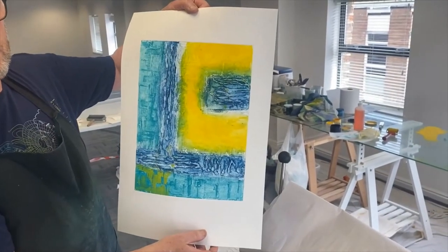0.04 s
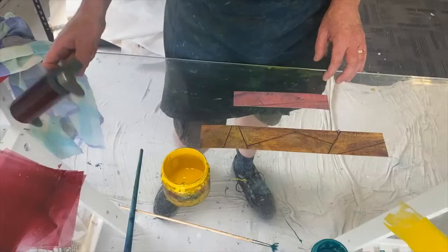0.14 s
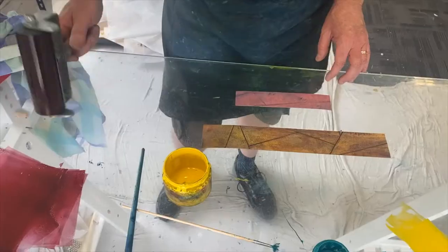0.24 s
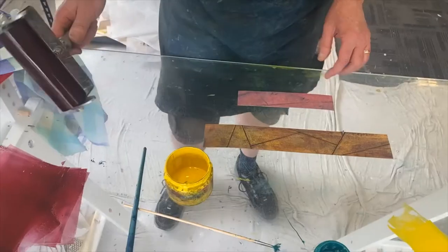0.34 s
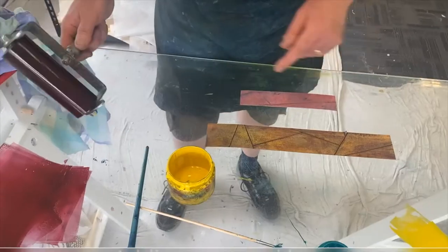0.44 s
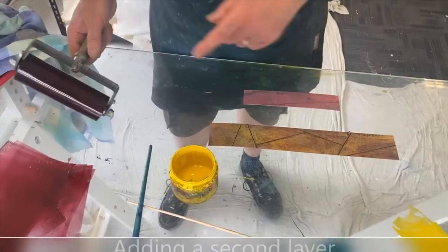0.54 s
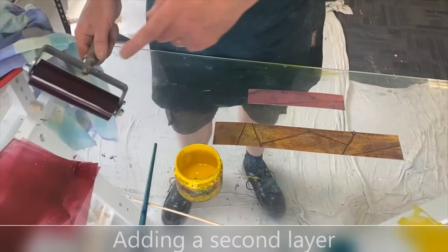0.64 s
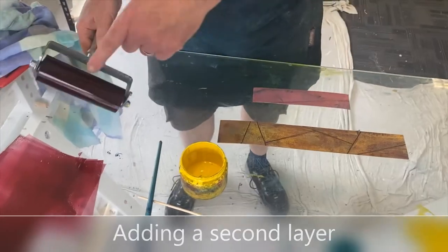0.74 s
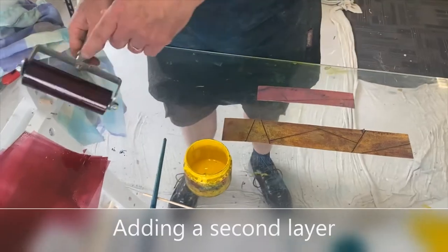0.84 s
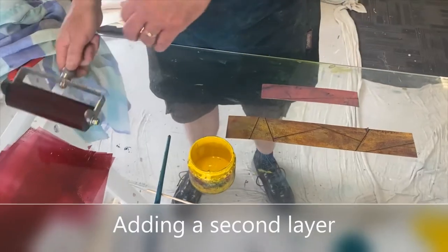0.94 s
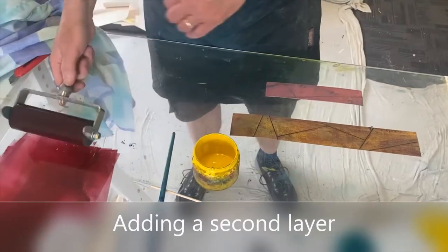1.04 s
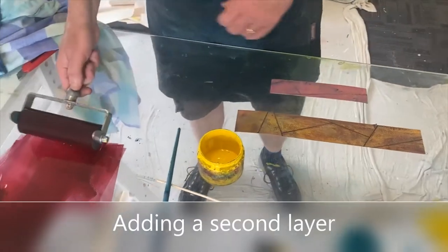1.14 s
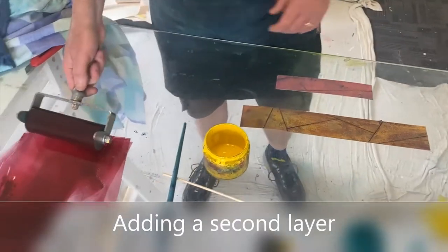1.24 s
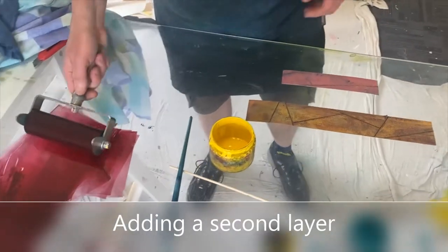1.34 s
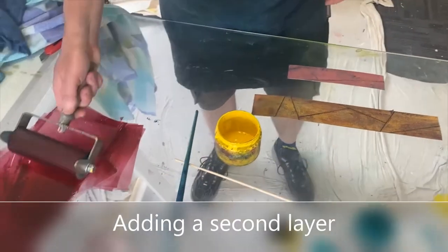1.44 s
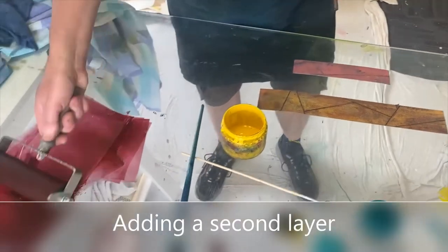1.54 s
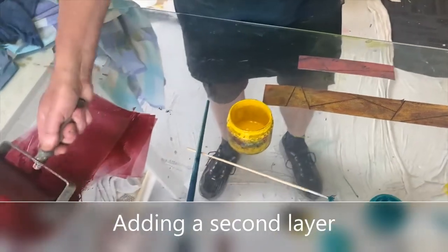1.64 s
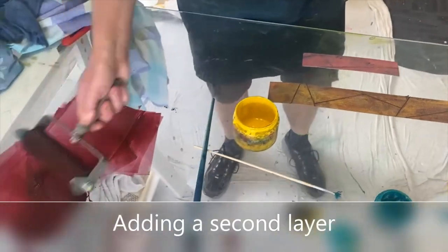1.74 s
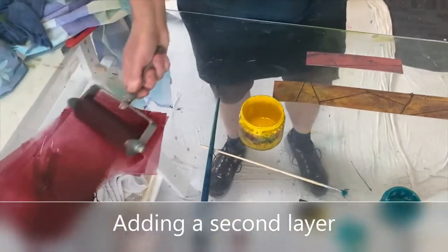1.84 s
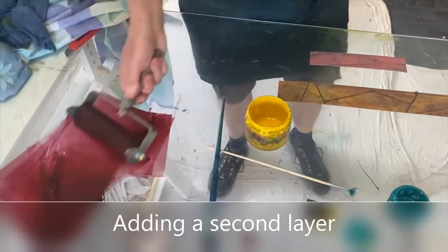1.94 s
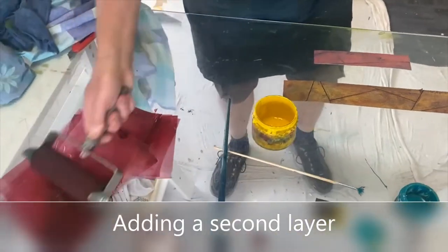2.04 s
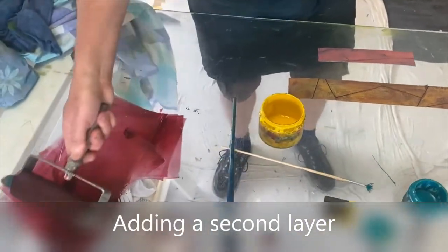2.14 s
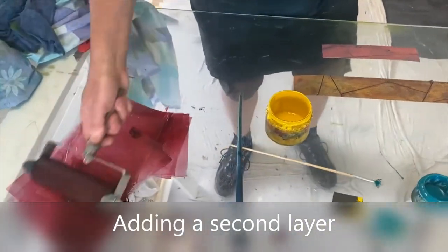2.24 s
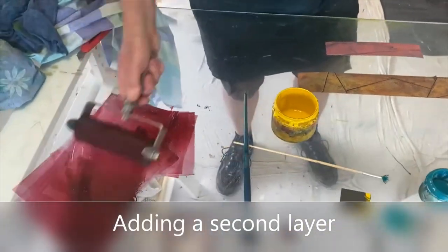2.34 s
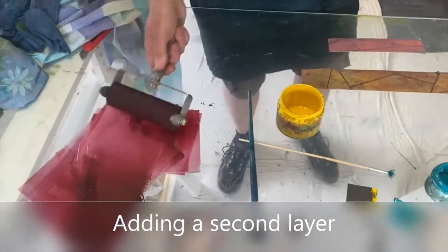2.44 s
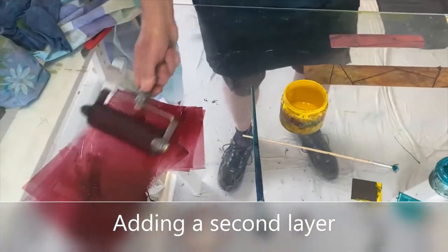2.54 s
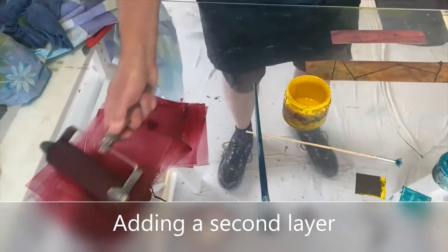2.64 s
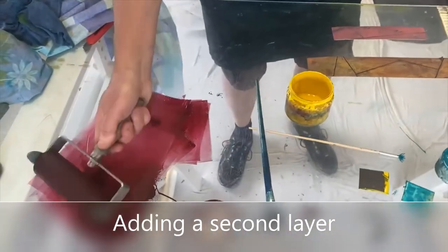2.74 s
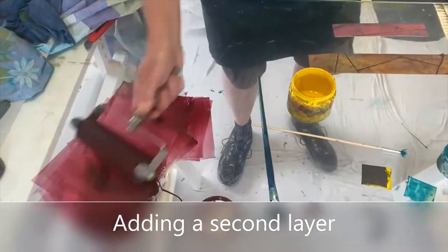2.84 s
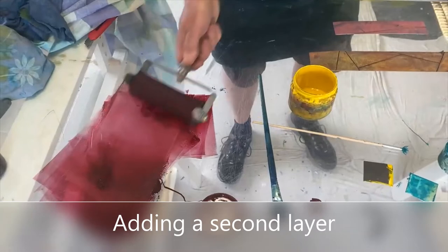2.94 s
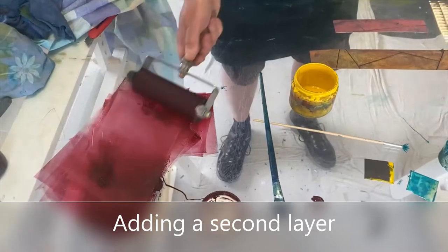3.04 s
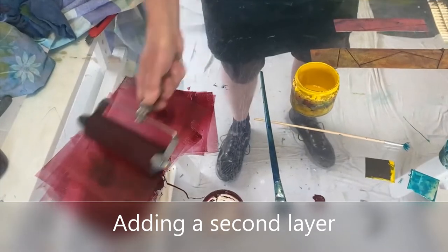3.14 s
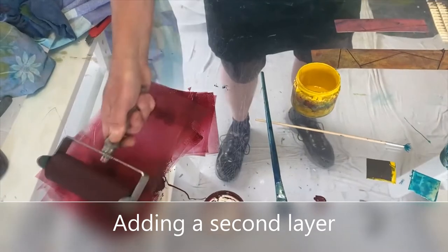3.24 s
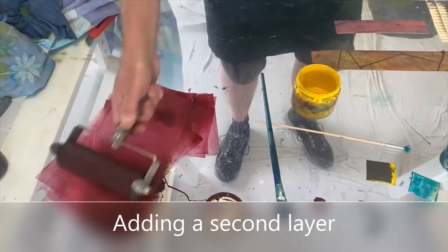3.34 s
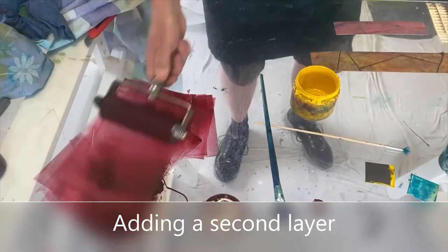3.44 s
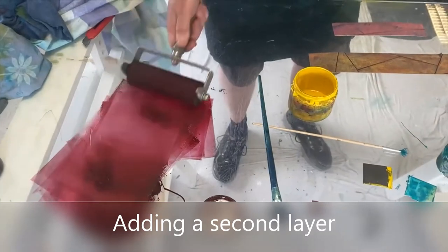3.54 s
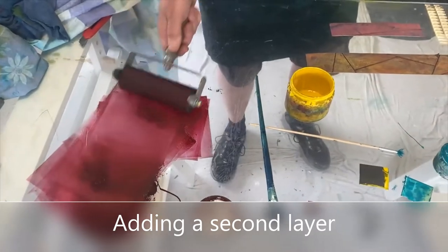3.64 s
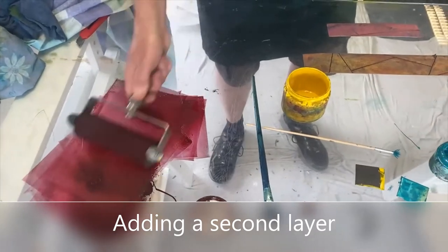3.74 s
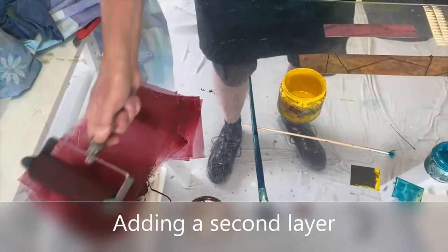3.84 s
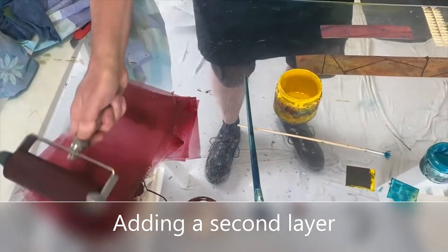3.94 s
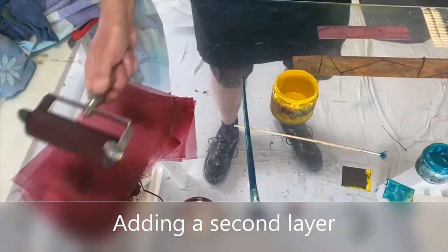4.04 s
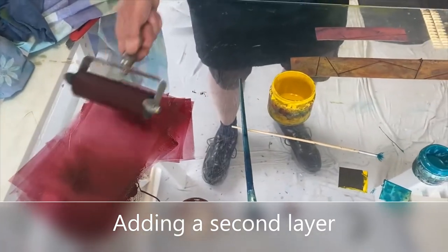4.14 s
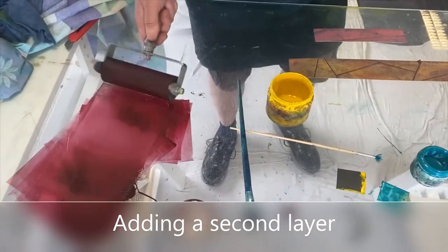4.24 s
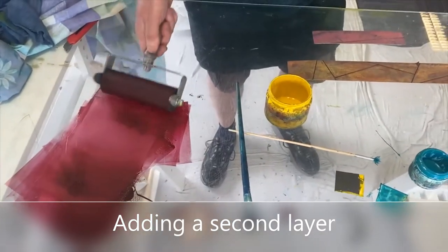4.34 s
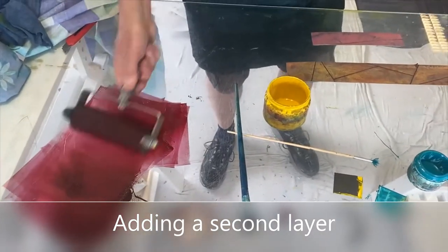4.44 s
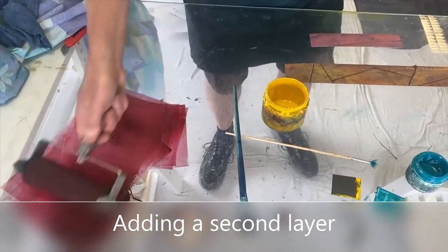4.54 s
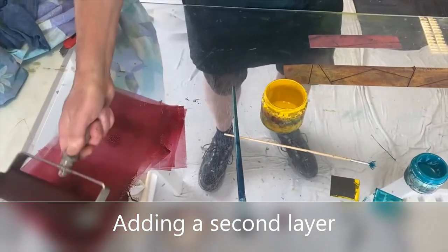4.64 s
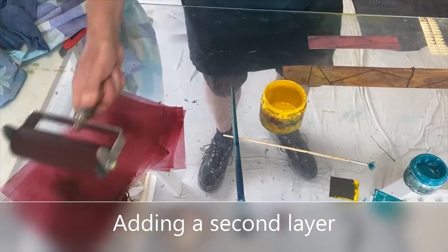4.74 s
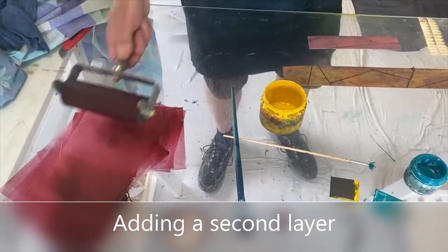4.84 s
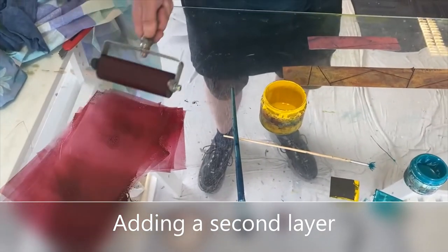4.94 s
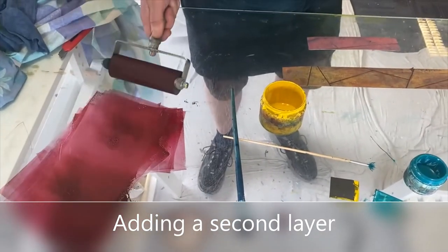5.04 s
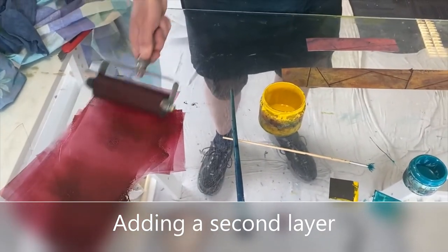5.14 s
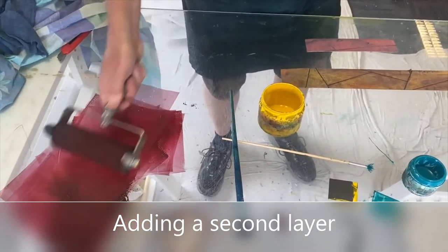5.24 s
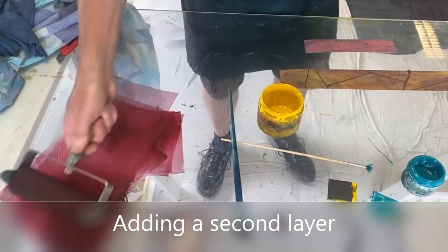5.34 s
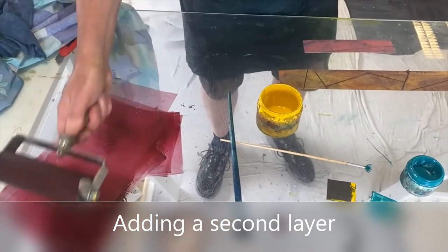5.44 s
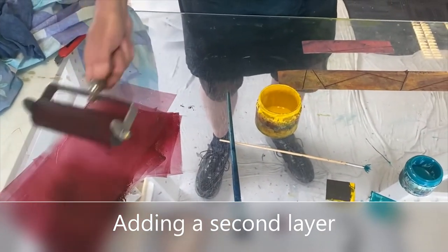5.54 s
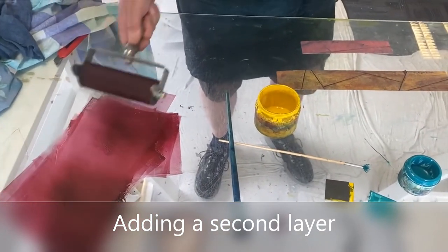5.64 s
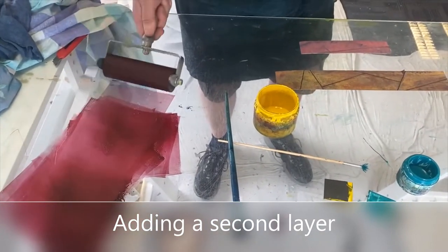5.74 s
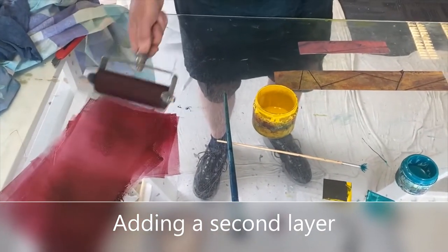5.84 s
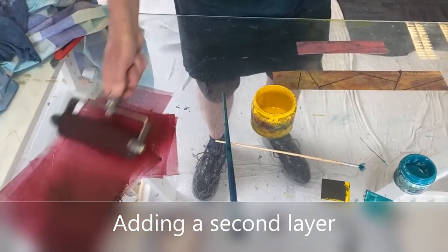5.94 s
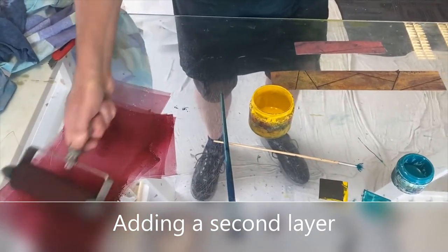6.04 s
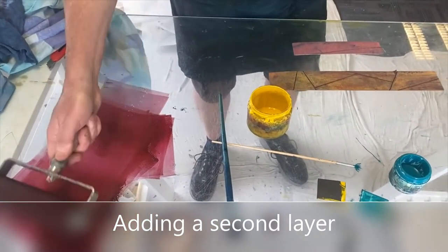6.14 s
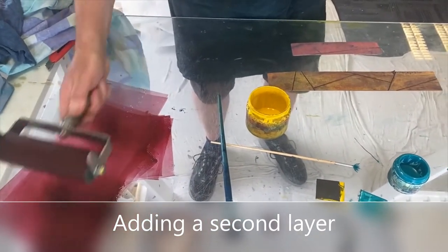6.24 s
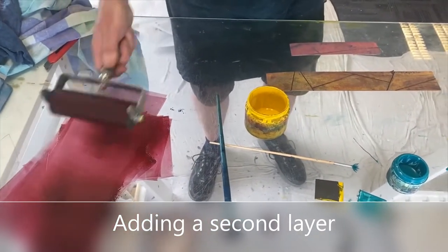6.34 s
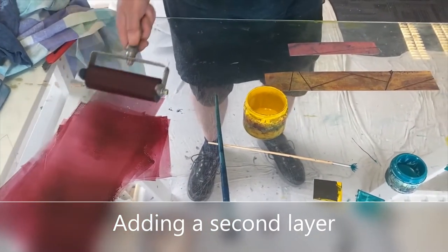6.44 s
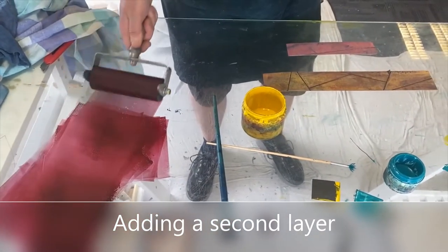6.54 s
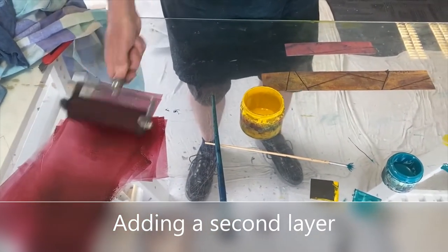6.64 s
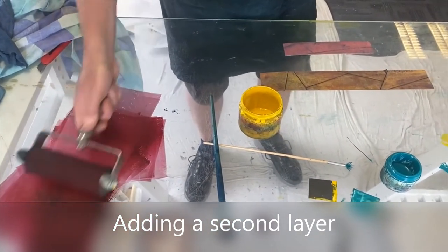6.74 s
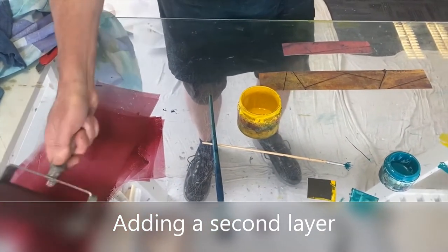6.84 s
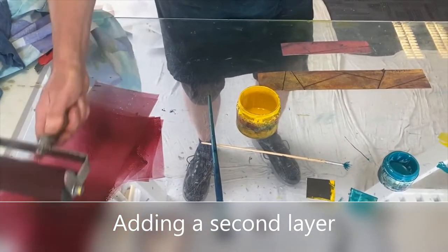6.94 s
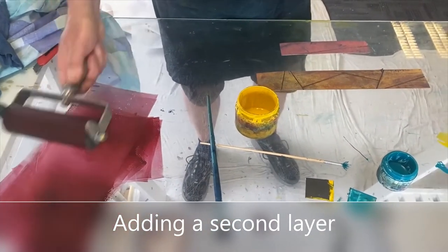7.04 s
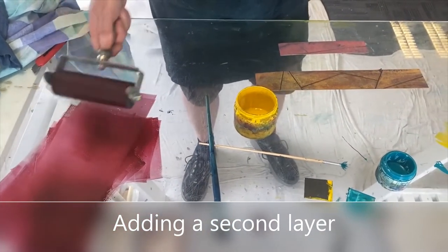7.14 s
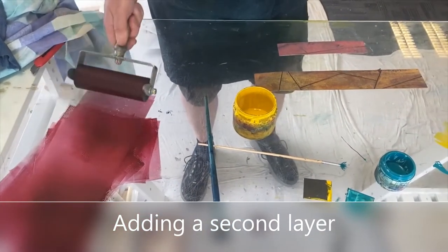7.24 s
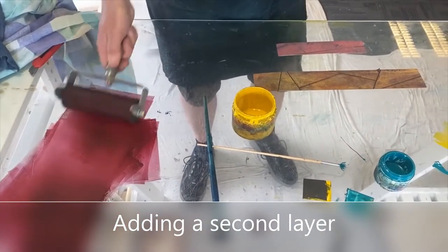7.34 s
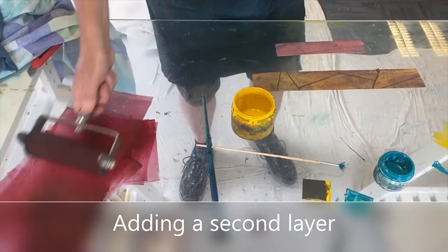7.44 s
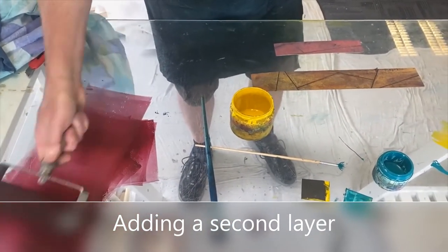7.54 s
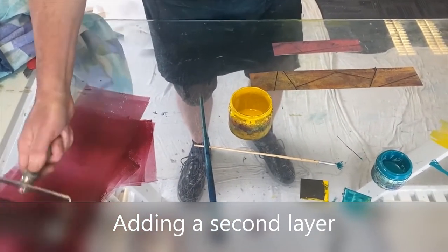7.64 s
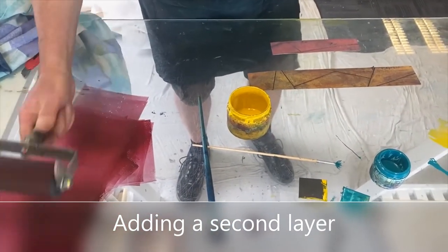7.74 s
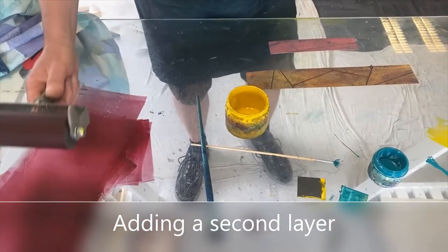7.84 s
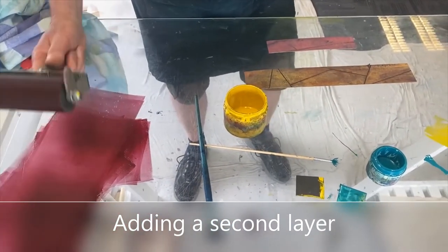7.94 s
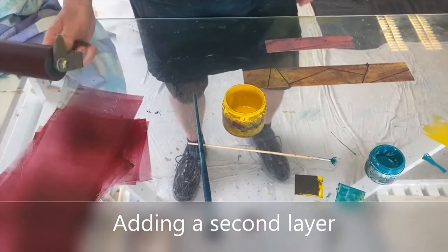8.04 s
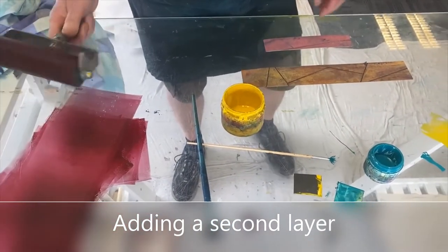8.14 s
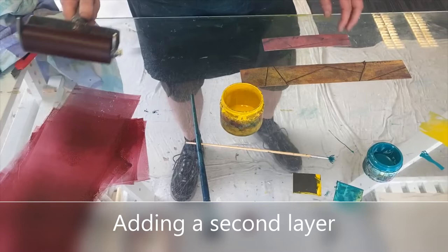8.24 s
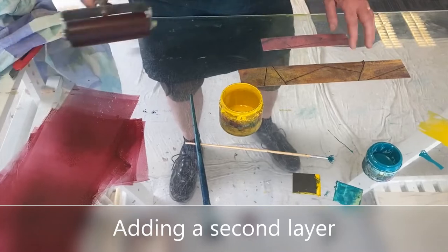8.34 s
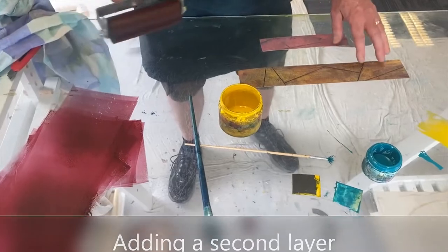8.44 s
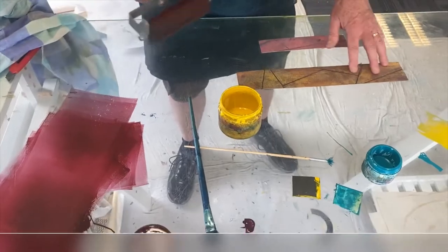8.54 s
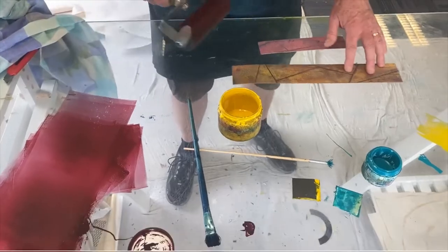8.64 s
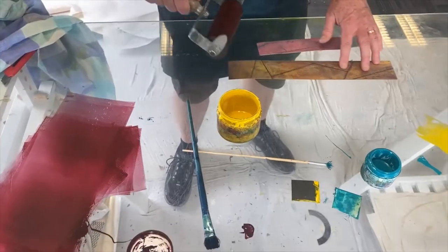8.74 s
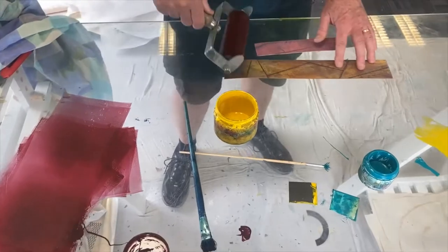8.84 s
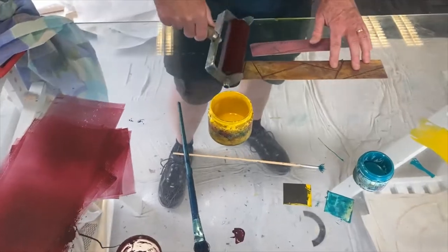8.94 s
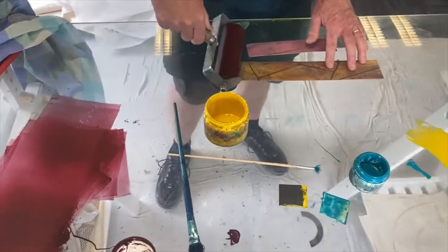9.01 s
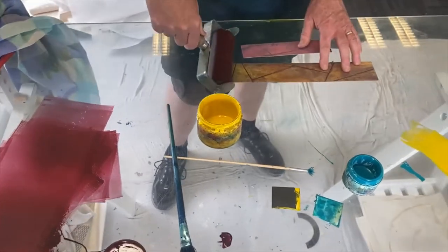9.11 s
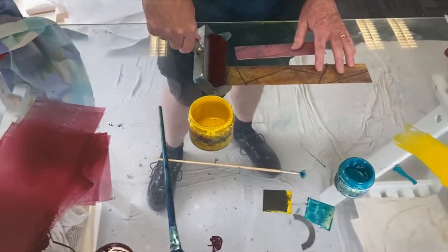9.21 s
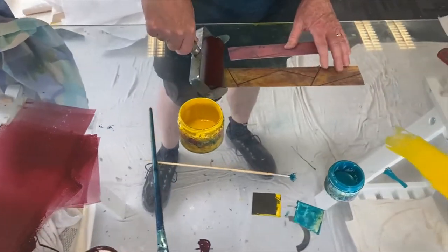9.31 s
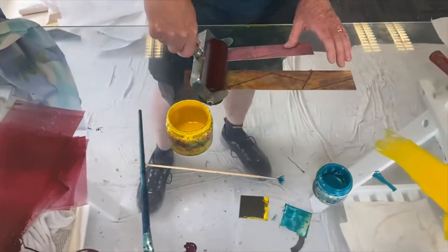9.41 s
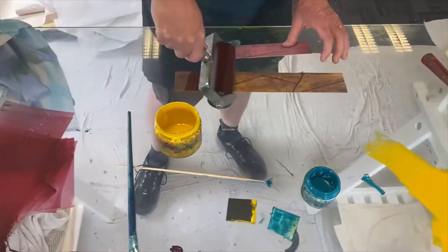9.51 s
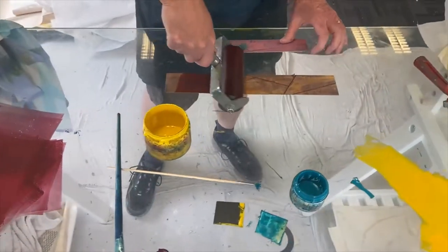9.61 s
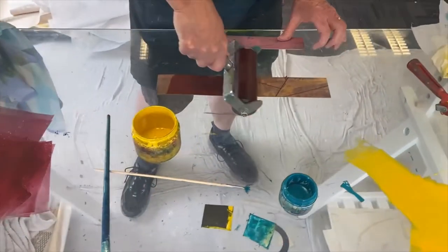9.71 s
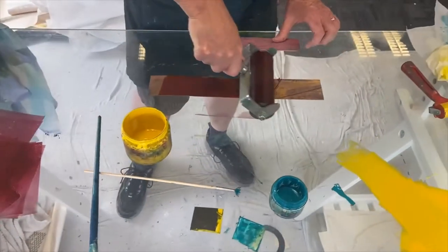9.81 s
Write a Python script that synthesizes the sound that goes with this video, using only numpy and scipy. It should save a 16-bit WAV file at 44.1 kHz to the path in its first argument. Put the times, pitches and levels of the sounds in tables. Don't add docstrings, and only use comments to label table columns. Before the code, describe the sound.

In a quiet studio, a rubber roller slaps onto glass and goes quickly back and forth through tacky ink, each stroke a bright, tearing rasp with sharp cracks. Then come five separate pulls, each a thud followed by a double sticky swell. Faint metal ticks, little axle squeaks and cloth rustles follow. Close handheld stereo microphone, small dry room.

```python
import sys
import numpy as np
from scipy import signal
from scipy.fft import rfft, irfft, next_fast_len
from scipy.io import wavfile
from scipy.ndimage import uniform_filter1d, minimum_filter1d

SR = 44100
rng = np.random.default_rng(int(sys.argv[2]) if len(sys.argv) > 2 else 0)


def gain_from_decibels(decibels):
    exponent = np.asarray(decibels, float) / 20
    return 10 ** exponent


def dump(signal):
    limited = np.clip(np.atleast_2d(signal).T, -1, 1)
    pcm = np.round(limited * 32767).astype(np.int16)
    wavfile.write(sys.argv[1], SR, pcm)


N = 435266
PADDED = next_fast_len(N)
STEP = 32

# start in seconds, peak level in dB.
LANDINGS = [
    (1.1533, -29),
    (1.2004, -25.5),
    (1.6546, -28.5),
    (1.6951, -16.5),
    (2.748, -29.5),
    (2.7734, -29),
]
# start in seconds, peak level in dB.
DROPS = [
    (4.2839, -31),
    (5.0265, -26),
    (5.7724, -20.5),
    (6.4943, -21.5),
    (7.2647, -22),
]


def rms_one(x):
    return x / np.sqrt(np.mean(x ** 2) + 1e-20)


def in_time(rows):
    s, *columns = np.transpose(rows)
    return [np.interp(np.arange(N) / SR, s, column) for column in columns]


def at_hz(points, hz):
    table_hz, values = np.array(points).T
    return np.interp(np.log(hz), np.log(table_hz), values)


def filtered(x, response):
    hz = np.maximum(np.fft.rfftfreq(PADDED, 1 / SR), 1)
    return irfft(rfft(x, PADDED) * response(hz), PADDED)[..., :N]


def coloured(x, spectrum):
    return rms_one(filtered(x, lambda hz: gain_from_decibels(at_hz(spectrum, hz))))


def drift(rate_hz):
    r = np.exp(-40 * np.pi * rate_hz / SR)
    noise = rng.standard_normal(N // 20 + 2002)
    slow = signal.lfilter([1], [1, -2 * r, r * r], noise)[2000:]
    return np.interp(np.arange(N) / 20, np.arange(len(slow)), rms_one(slow))


def patches(shape, size):
    field = uniform_filter1d(rng.standard_normal(shape), size[0], axis=-2)
    return rms_one(uniform_filter1d(field, size[1], axis=-1))


def ring(clicks, hz, t60_s):
    r, w = gain_from_decibels(-60 / (t60_s * SR)), 2 * np.pi * hz / SR
    return signal.lfilter([0, np.sin(w)], [1, -2 * r * np.cos(w), r * r], clicks + 1e-18)


def clicks_at(times_s, sizes):
    out = np.zeros(N)
    np.add.at(out, (np.asarray(times_s) * SR).astype(int), sizes)
    return out


def swells(rows):
    blunt = 0.1
    t, power = np.arange(0, N, STEP) / SR, 1e-12
    for s, db, rise_s, fall_s in rows:
        away = np.where(t < s, (s - t) / rise_s, (t - s) / fall_s)
        power = power + gain_from_decibels(2 * db - 51.8 * (np.hypot(away, blunt) - blunt))
    return power


def lingering(db, db_per_s):
    ramp = db_per_s * np.arange(0, N, STEP) / SR
    return np.maximum.accumulate(db + ramp) - ramp


def whine():
    # frequency in Hz, rms level in dB.
    whine_tones = [(1771, -88), (3564, -70)]
    t, out = np.arange(N) / SR, 0
    for hz, db in whine_tones:
        level_db = db + 1.0 + 0.95 * drift(25) + 6.1 * (hz < 2000)
        out = out + gain_from_decibels(level_db) * np.sin(2 * np.pi * hz * t)
    return out * (t < .13)


def room_tone():
    # frequency in Hz, level in dB per Hz.
    air_spectrum = [(15, -49.5), (25, -5.5), (74, -1), (140, -6.5), (192, -21), (248, -12), (604, -31),
                    (644, -40), (924, -31), (1030, -36.5), (1120, -36), (4000, -79.5), (5200, -108),
                    (8800, -120)]
    # time in seconds, level in dB.
    stir_level = [(0, -75), (.13, -68), (.17, -57.5), (1.1, -64), (1.5, -57.5), (3.6, -73.5), (4.1, -65.5),
                  (9.87, -66)]
    air_db = -49.5 - 5.0 + 1.0 * drift(3.3)
    air = gain_from_decibels(air_db) * coloured(rng.standard_normal((2, N)), air_spectrum)
    bustle = 0
    for hz, db in ((650, 8.5), (900, 1.5), (1250, -2.0), (1600, -6), (1850, -6.5), (2100, -10.5)):
        patch = rms_one(ring(rng.standard_normal((2, N)), hz, 0.0092))
        bustle = bustle + gain_from_decibels(2.5 * drift(4.8) + db) * patch
    low_pass = signal.butter(6, 2300, fs=SR, output="sos")
    return air + gain_from_decibels(in_time(stir_level)[0] - 8.5) * rms_one(signal.sosfilt(low_pass, bustle))


def snaps(t60_s=.012):
    # start in seconds, peak level in dB.
    big_threads = [(0.3384, -35), (2.2157, -14), (2.2411, -16), (2.3793, -27.5), (2.3997, -15.5),
                   (2.5065, -19.5), (2.6422, -28.5), (2.7978, -11), (3.2857, -44.5), (3.3092, -45),
                   (3.3371, -20.5), (3.598, -46), (3.6265, -42), (7.7132, -40), (9.1549, -35),
                   (9.3764, -38)]
    # start in seconds, peak level in dB.
    frame_ticks = [(0.1718, -48.5), (0.8123, -56), (3.912, -48), (6.9928, -61), (7.0821, -67),
                   (7.8815, -60), (7.913, -60), (7.9761, -55), (7.998, -43), (8.0609, -43.5), (8.1207, -52),
                   (8.2829, -52), (8.302, -59), (8.5163, -41.5), (8.535, -59), (8.5992, -54.5),
                   (8.666, -61), (8.724, -62), (9.091, -55), (9.1384, -49)]
    # frequency in Hz, level in dB, t60 in seconds.
    frame_modes = [(1860, -4.5, .03), (2260, -5.5, .02), (2820, 8.5, .03), (3470, 3.5, 0.056),
                   (3614, 2.5, 0.028), (4686, -9.5, .015), (4815, -4, .015)]
    # start in seconds, peak level in dB, frequency in Hz.
    axle_squeaks = [
        (6.898, -55.5, 2400),
        (6.992, -53, 2550),
        (7.0828, -55, 2550),
        (7.1726, -67, 2660),
        (7.314, -44, 2540),
        (7.881, -66, 2510),
        (8.12, -57, 3310),
    ]
    kinds = (LANDINGS + DROPS, (-8.5, -15.5)), (big_threads, (-17, -14.5)), (frame_ticks, (-3, -17))
    events = [(*row, *colour) for rows, colour in kinds for row in rows]
    s, peak_db, ring_db, sheen_db = np.transpose(events)

    envelope, t = np.zeros((2, N)), np.arange(SR // 8) / SR
    shape = gain_from_decibels(-60 * t / t60_s) + gain_from_decibels(-12.5 - 11 * t / t60_s)
    for start, db, colour_db in zip((s * SR).astype(int), peak_db, zip(ring_db, sheen_db)):
        envelope[:, start:start + len(t)] += gain_from_decibels(db + np.array(colour_db))[:, None] * shape

    bright = [(3000, -32.0), (6500, -7.5), (10000, -8.5), (16000, -7.5)]
    burst = envelope[1] * coloured(rng.standard_normal((2, N)), bright)
    metallic = [(500, -34), (1500, -12), (3200, -2.0), (6500, -2.5), (10000, -18.0)]
    burst[0] += gain_from_decibels(-9.0) * envelope[0] * coloured(rng.standard_normal(N), metallic)

    luck_db = rng.normal(0, 3.5, (len(s), len(frame_modes)))
    for k, (hz, db, decay_s) in enumerate(frame_modes):
        strikes = clicks_at(s, gain_from_decibels(peak_db + ring_db + db - 27.5 + luck_db[:, k]))
        burst[0] += ring(strikes, hz, decay_s)
    for spread, late_s in ((0.87, 0.0084), (1.08, .0005), (1.0, 0.0089)):
        for at_s, db, hz in axle_squeaks:
            burst[0] += ring(clicks_at([at_s + late_s], gain_from_decibels(db - 10.0)), hz * spread, 0.027)
    return burst


def rolling():
    # peak in seconds, level in dB, rise and fall in seconds, dull share in dB.
    rustle_rows = [(.2, -67.5, 0.064, 0.2, 4), (.34, -57, 0.0041, 0.03, 4), (.54, -73, 0.17, 0.63, 1.5),
                   (.93, -76.5, 0.25, 0.5, 0), (7.68, -70, .1, .15, -17), (7.86, -80, .06, 0.27, 8),
                   (8.01, -66.5, 0.049, 0.22, 6.5), (8.29, -74, 0.071, 0.16, 6),
                   (8.53, -62, 0.016, 0.034, 15), (8.68, -75.5, .5, 0.37, 2),
                   (9.165, -68.5, .06, 0.025, 13)]
    # peak in seconds, level in dB, rise and fall in seconds per 20 dB.
    grip_rows = [(1.29, -51.5, 0.12, .5), (1.51, -40.5, 0.085, .08), (1.71, -36, 0.025, .2),
                 (1.92, -42.5, 0.022, .08), (2.07, -30.5, 0.12, .04), (2.2, -51.5, 0.095, .03),
                 (2.245, -33.5, 0.043, .17), (2.395, -34, .05, .07), (2.513, -35.5, 0.046, .06),
                 (2.65, -32.5, .14, .055), (2.81, -28.5, .05, .1), (2.92, -30, 0.04, .08),
                 (3.07, -36.5, 0.086, .12), (3.195, -30.5, 0.11, .05), (3.347, -27, 0.051, .11),
                 (3.478, -29.5, 0.058, .1), (3.68, -34.5, 0.093, .1), (3.815, -32, 0.14, .04)]
    # peak in seconds, level in dB.
    first_turns = [
        (4.412, -37),
        (5.189, -37.5),
        (5.917, -37),
        (6.66, -36),
        (7.394, -36.5),
    ]
    # peak in seconds, level in dB, seconds until lift-off.
    second_turns = [
        (4.542, -33.5, 0.039),
        (5.32, -35, 0.028),
        (6.048, -35, 0.026),
        (6.799, -33.5, 0.016),
        (7.527, -35, 0.046),
    ]
    # peak in seconds, level in dB, rise and fall in seconds per 20 dB.
    strip_rows = [
        (9.38, -63, 0.27, .2),
        (9.6, -50, 0.36, .19),
        (9.87, -53, 0.24, .1),
    ]
    # start in seconds, level in dB.
    sway_rows = [
        (1.2, -41),
        (4.3, -41),
        (5.04, -38.5),
        (5.77, -50),
        (6.5, -48.5),
        (7.27, -45),
    ]
    t, slab = np.arange(0, N, STEP) / SR, swells(grip_rows)
    for (drop_s, _), (s, db), (s2, db2, hold_s) in zip(DROPS, first_turns, second_turns):
        turns = swells([(s, db, .11, 0.092), (s2, db2, 0.13, 0.11)])
        lift_db = -904.5 * np.clip(t - s2 - hold_s, 0, None)
        slab = slab + turns * (t > drop_s) * gain_from_decibels(2 * lift_db)
    ink = slab + swells(strip_rows)
    ink_db = 10 * np.log10(ink)

    fading_tail = gain_from_decibels(2 * lingering(ink_db - 21, 115))
    rustles = [swells([row[:-1]]) for row in rustle_rows]
    scuffs = swells([(s + .007, db - 25, .004, 0.036) for s, db in LANDINGS + DROPS])
    power = ink + fading_tail + sum(rustles) + scuffs
    dull = ink * (-13 - 0.2677 * (ink_db + 29.5))
    dull = dull + fading_tail * -10.5 + scuffs * 6.5
    dull = dull + sum(rustle * row[-1] for rustle, row in zip(rustles, rustle_rows))

    touching_db = np.where(slab > 1e-6, -44, -95)
    after = swells([(s + .15, db, 0.22, 0.2) for s, db in sway_rows])
    shake = gain_from_decibels(2 * lingering(touching_db, 51)) + after
    swaying = swells([(s + 0.065, db, 0.1, 0.22) for s, db in sway_rows])
    controls = 10 * np.log10(power), dull / power, 10 * np.log10(shake), 10 * np.log10(swaying)
    return in_time(np.column_stack([t, *controls]))


def tacky(x, ridge_db):
    cells = signal.stft(x, nperseg=1024)[2]
    cells = cells * gain_from_decibels(ridge_db * patches(cells.shape[1:], size=(3, 4)))
    return rms_one(signal.istft(cells, nperseg=1024)[1][:, :N])


def rasp(rasp_db, dull_db):
    # frequency in Hz, level in dB per Hz.
    thread_spectrum = [(700, -24), (1500, -16), (2500, -16), (4000, -8), (6500, -4), (9000, -1), (11500, 2),
                       (13500, -0.5), (15500, 2.5)]
    sizes = gain_from_decibels(2.2 * np.minimum(rng.exponential(1, (2, N)), 5)) * rng.choice([-1, 1], (2, N))
    breaking = rng.random((2, N)) < 14000 / SR
    breaks = sizes * breaking * gain_from_decibels(1.0 * drift(150) + 1.0 * drift(30))
    threads, out = tacky(coloured(breaks, thread_spectrum), ridge_db=2.5), 0
    faint = np.clip((-51.0 - rasp_db) / 20, 0, 1)
    for octave in np.arange(0, 5.5, .75):
        band = filtered(threads, lambda hz: np.clip(1 - abs(np.log2(hz / 500) - octave) / .75, 0, 1))
        tilt = np.clip((3.6 - octave) / 1.34, 0, 1)
        fill_db = tilt * (np.clip(dull_db, -25, 12) + 17)
        sheen_db = -7 * faint * max(octave - 4, 0)
        out = out + band * gain_from_decibels(fill_db + sheen_db + 1.0 * drift(14))
    return gain_from_decibels(rasp_db - 1.0) * out


def thuds(swell_cycles=0.87):
    # start in seconds, first mode level in dB,
    # second mode and knock levels in dB against the first.
    thud_rows = [(1.153, -33, -10, -19), (1.1984, -23, -4, -10), (1.691, -40, -10, -15.5),
                 (2.3, -37, -3, -17), (2.4, -34.5, -3.5, -20), (3.069, -36, 4.5, -17),
                 (3.7, -36.5, -14.5, -17), (4.285, -41, 3.5, -1), (4.299, -22, 4, -11.5),
                 (5.026, -30.5, 4, -10), (5.041, -27.5, -8, -18.5), (5.772, -30.5, 8, -10),
                 (6.497, -26.5, 5, -6.5), (6.824, -38, 8.5, -15.5), (7.268, -16.5, -3, -18),
                 (7.375, -39.5, -20, -12), (8.197, -45, 2, -11), (9.538, -39, -7, -25)]
    # frequency in Hz, t60 in seconds.
    slab_modes = [(88, 0.23), (150, 0.12), (270, 0.15), (372, 0.11), (500, .12), (1000, 0.059)]
    out, t = np.zeros(N + SR), np.arange(SR // 2) / SR
    chance = rng.random((len(thud_rows), len(slab_modes), 2))
    for (s, peak_db, second_db, knock_db), luck in zip(thud_rows, chance):
        mode_db = 0, second_db, knock_db + 6.5, knock_db
        for k, (hz, t60_s) in enumerate(slab_modes):
            hz = hz * (1 + 0.09 * (luck[k, 1] - .5))
            rise = (1 - np.exp(-t * hz / swell_cycles)) ** 2
            upper = np.sin(2 * np.pi * (hz * 1.08 * t + luck[k, 0]))
            pair = np.sin(2 * np.pi * hz * .95 * t) + 0.53 * gain_from_decibels(-90 * t) * upper
            level_db = peak_db + mode_db[min(k, 3)] - 6.8 * max(k - 3, 0)
            out[int(s * SR):][:len(t)] += gain_from_decibels(level_db - 60 * t / t60_s) * rise * pair
    s, peak_db, _, knock_db = np.transpose(thud_rows)
    clicks = clicks_at(s, gain_from_decibels(peak_db + knock_db - 10))
    knock = signal.lfilter([1], [1, -gain_from_decibels(-60 / (.07 * SR))], clicks)
    woody = [(250, -20.0), (550, 1.5), (900, 0), (1500, -1.5), (3500, -28.5), (9000, -46.0)]
    return out[:N] + knock * coloured(rng.standard_normal(N), woody)


def rumble(rumble_db):
    # frequency in Hz, width in Hz, level in dB.
    resonances = [(72.4, 54.6, 0.5), (107, 27, -1), (144.1, 13, -3.5), (267, 56, -11.5), (358, 43, -15.5),
                  (560, 47, -24.5)]
    shake, out = rng.standard_normal(N) * gain_from_decibels(3.8 * drift(10.4)), 0
    for k, (hz, width_hz, db) in enumerate(resonances):
        r, w = np.exp(-np.pi * width_hz / SR), 2 * np.pi * hz / SR
        mode = signal.lfilter([1, 0, -1], [1, -2 * r * np.cos(w), r * r], shake)
        out = out + (-1) ** k * gain_from_decibels(db) * rms_one(mode)
    return gain_from_decibels(rumble_db - 4.5) * rms_one(out)


def sway(sway_db):
    hz = 72 * (1 + .06 * drift(5))
    return gain_from_decibels(sway_db + 2) * np.sin(2 * np.pi * np.cumsum(hz) / SR)


def studio(x, t60_s=0.25):
    t = np.arange(SR // 2) / SR
    tail = rng.standard_normal((2, len(t))) * gain_from_decibels(-60 * t / t60_s) * (t > .006)
    tail = signal.lfilter([.5], [1, -.5], tail)
    return signal.fftconvolve(x[None], tail / np.sqrt(np.sum(tail[0] ** 2)), axes=1)[:, :N]


def ports(pair):
    # frequency in Hz, left lead in rad.
    port_phase = [(700, 0), (1400, 2.0), (2900, 0), (7600, -.3), (8400, -2.9), (9550, -3.3), (10200, -5.9),
                  (12300, -6.6), (12800, -9.2), (13700, -9.6), (14300, -12.3), (16000, -12.7)]
    # frequency in Hz, left minus right in dB.
    port_lean = [(60, -0.5), (250, -2.5), (600, -1.6), (2500, 1.5), (8000, 0.5)]
    # frequency in Hz, likeness 0 to 1.
    port_likeness = [(60, 0.93), (150, 0.97), (300, 0.48), (640, 0.042), (1400, 0.31), (2500, 0.07),
                     (4000, 0.46), (7000, 0.75), (15000, 0.55)]

    def port(sign):
        def response(hz):
            phase = np.exp(.5j * sign * at_hz(port_phase, hz))
            turn = phase * gain_from_decibels(sign * at_hz(port_lean, hz) / 2) / np.sqrt(2)
            alike = np.clip(at_hz(port_likeness, hz), 0, 1)
            return turn * np.sqrt([1 + alike, 1 - alike]) * [[1], [sign]]
        return filtered(pair, response).sum(axis=0)
    return np.array([port(0.92), port(-0.99)])


def scene():
    # time in seconds, level in dB.
    edit_fade = [(0, 4.5), (.02, 3), (.1, 6.5), (.128, -32), (.15, 2), (.17, 7)]
    rasp_db, dull_db, rumble_db, sway_db = rolling()
    bright = rasp(rasp_db, dull_db) + snaps()
    rumble_db = rumble_db + 0.22 * (np.clip(rasp_db, -60, -30) + 36.5)
    table = thuds()
    shaken = np.array([rumble(rumble_db), rumble(rumble_db)])
    wet = gain_from_decibels(-16.0) * studio(bright[0] + table)
    shared = (table + whine() + sway(sway_db)) * [[1], [0]]
    heard = ports(bright + shared + shaken + wet + room_tone())
    return heard * gain_from_decibels(in_time(edit_fade)[0])


def starved(pair):
    mid, side = (pair[0] + pair[1]) / 2, (pair[0] - pair[1]) / 2
    hz, _, cells = signal.stft(mid, SR, nperseg=2048, noverlap=1536)
    power, middle = abs(cells) ** 2, (hz > 700) & (hz < 4600)
    busy = power[hz > 4600].sum(axis=0) > 1.5 * power[middle].sum(axis=0)
    dropped = (patches(cells.shape, size=(5, 8)) > 1.3) & busy & middle[:, None]
    cancelled = (hz > 12750) & (hz < 13750) | (hz > 8350) & (hz < 9500)
    dropped |= cancelled[:, None] & (patches(cells.shape, size=(60, 7)) > -.6)
    treble = power[hz > 2500].sum(axis=0)
    dropped &= treble < 30 * minimum_filter1d(treble, size=5, origin=2)
    cells = cells * np.where(dropped, .02, 1)
    mid = signal.istft(cells, nperseg=2048, noverlap=1536)[1][:N]
    return np.array([mid + side, mid - side])


def band_limit(x):
    return signal.sosfilt(signal.butter(12, 17030, fs=SR, output="sos"), x)


def record(dry):
    dry = signal.sosfilt(signal.butter(2, 40, "high", fs=SR, output="sos"), dry)
    dry = signal.sosfilt(signal.ellip(10, .5, 58, 15750, fs=SR, output="sos"), dry)
    mix = starved(dry)
    return band_limit(mix)


dry = scene()
out = record(dry)
dump(out)
```